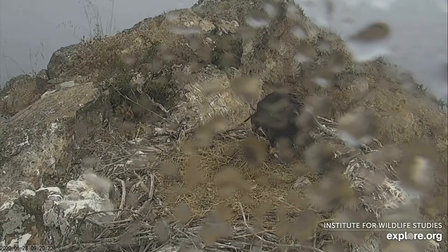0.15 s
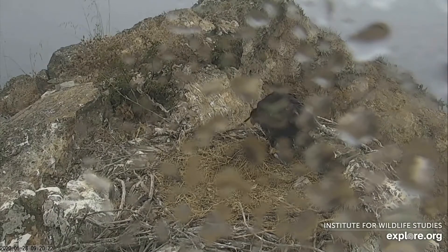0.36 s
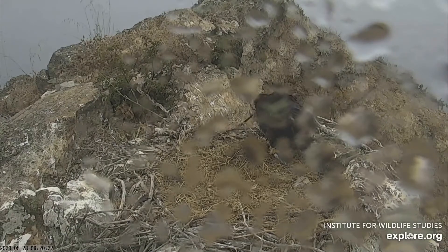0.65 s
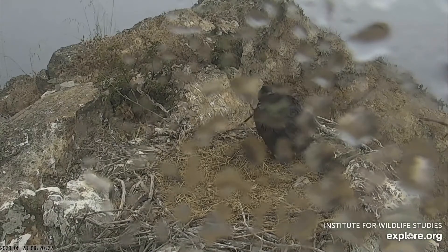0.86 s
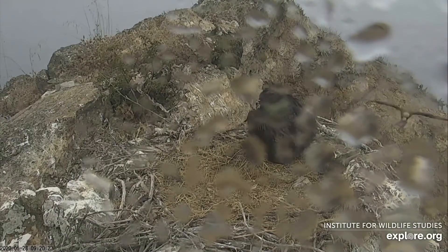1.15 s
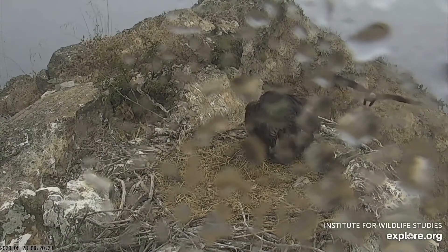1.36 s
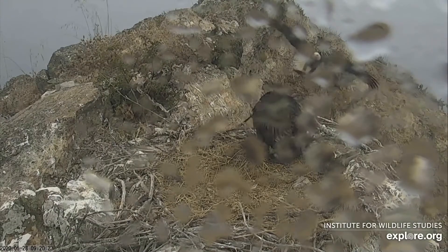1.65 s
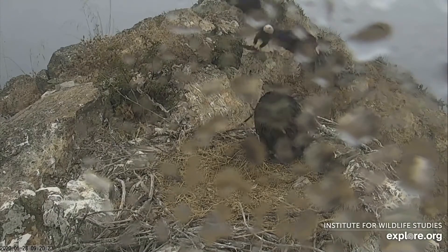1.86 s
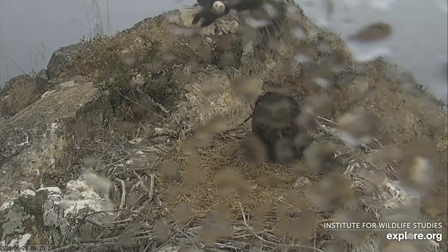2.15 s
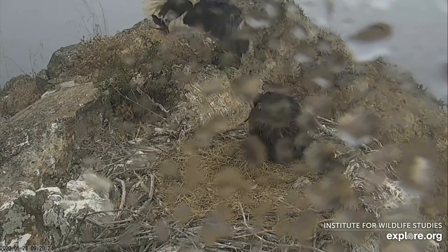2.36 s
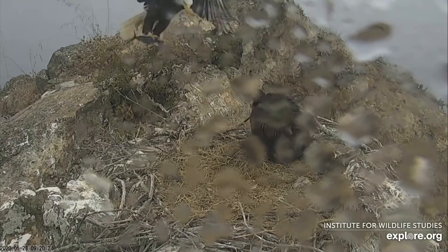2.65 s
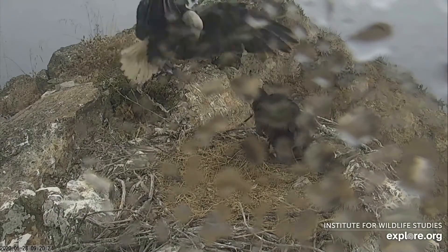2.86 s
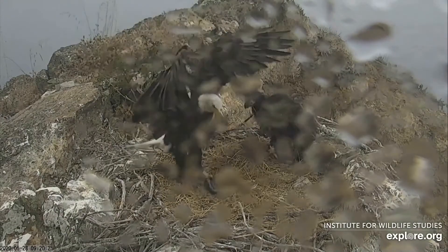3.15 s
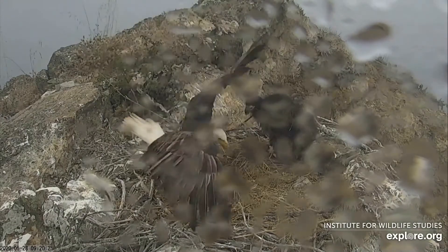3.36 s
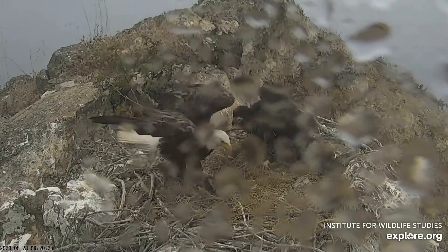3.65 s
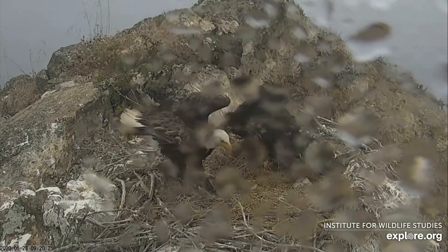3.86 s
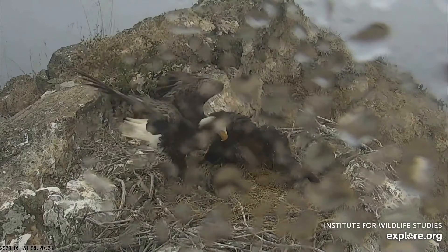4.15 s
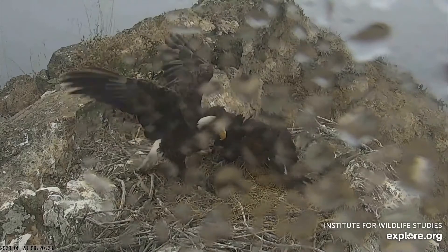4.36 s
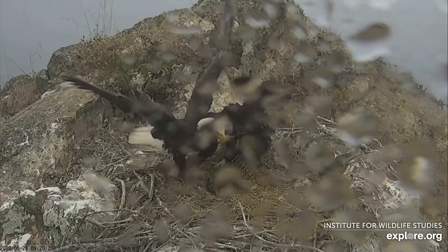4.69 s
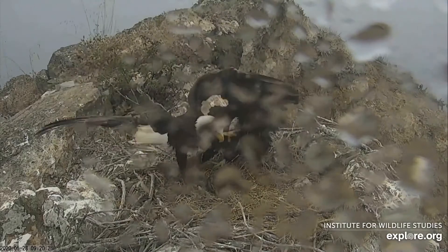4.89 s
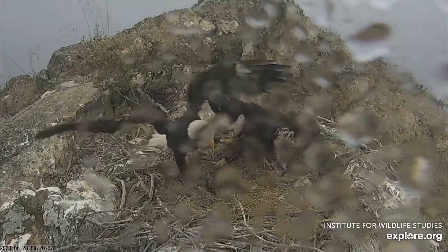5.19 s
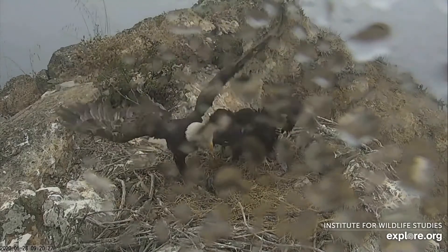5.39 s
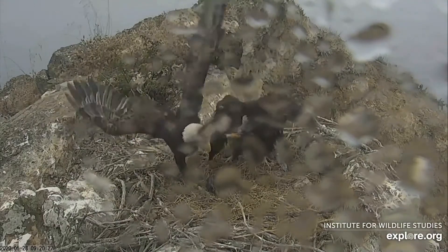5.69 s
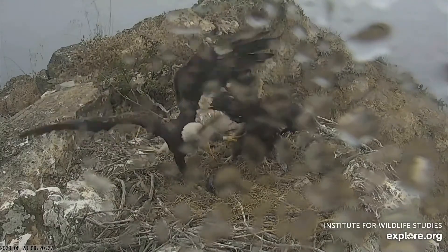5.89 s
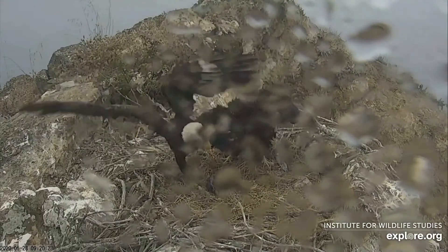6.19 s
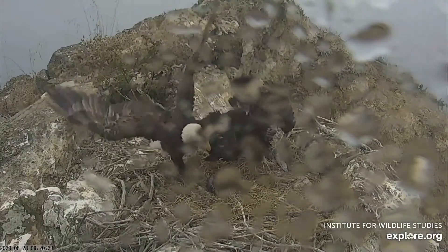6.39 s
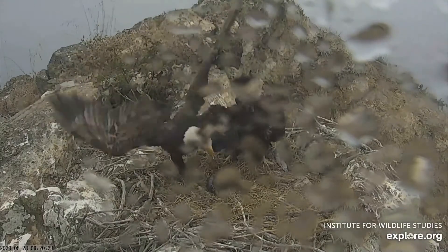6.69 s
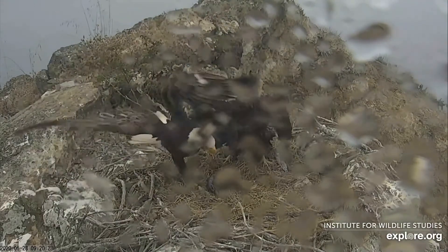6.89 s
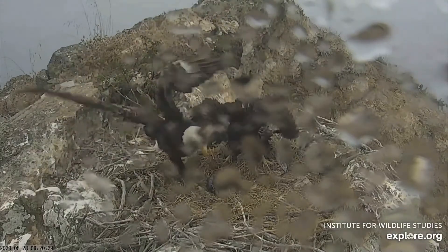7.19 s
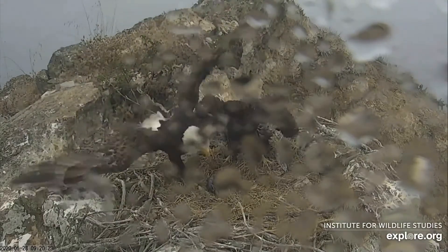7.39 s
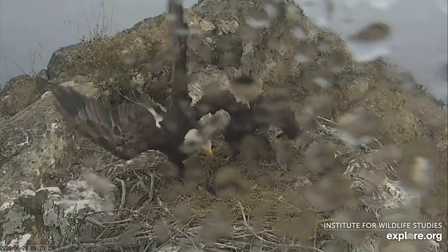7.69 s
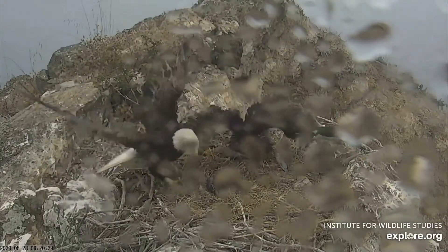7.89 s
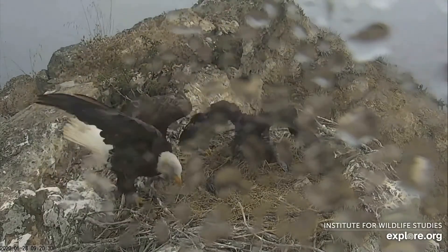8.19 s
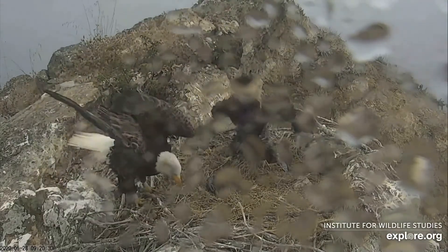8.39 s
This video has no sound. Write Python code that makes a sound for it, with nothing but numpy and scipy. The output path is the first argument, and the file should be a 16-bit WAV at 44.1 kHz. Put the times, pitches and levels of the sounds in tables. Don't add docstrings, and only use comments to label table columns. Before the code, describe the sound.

Steady rain rumbles, patters and hisses around an exposed hilltop nest. A young eagle starts faint, near-pure begging whistles. Wings whoosh in, sticks crack and feet land with a soft low thump. The young bird's calls then become much louder, lower and slightly hoarse, in three wavering stretches, before a late step, more cracks and one thin drooping whistle. One outdoor microphone in a nasal-sounding housing, with thin, slightly watery sound quality.

```python
import sys
import numpy as np
from scipy import signal
from scipy.fft import rfft, irfft, next_fast_len
from scipy.io import wavfile
from scipy.ndimage import uniform_filter1d, minimum_filter1d, map_coordinates

SR = 44100
rng = np.random.default_rng(int(sys.argv[2]) if len(sys.argv) > 2 else 0)


def pcm_store(signal):
    levels = np.round(np.clip(np.atleast_2d(signal), -1, 1) * 32767)
    wavfile.write(sys.argv[1], SR, levels.astype(np.int16).T)


def boost_factor(decibels):
    exponent = np.asarray(decibels, float) / 20
    return 10 ** exponent


N = 376613
STEP = 44


def unit(x):
    return x / np.sqrt(np.mean(x ** 2) + 1e-20)


def curves(rows):
    s, *cols = np.transpose(rows)
    return [np.interp(np.arange(N) / SR, s, c) for c in cols]


def wobble(rate):
    knots = rng.standard_normal(int(N * rate / SR) + 4)
    return map_coordinates(knots, [np.arange(N) * rate / SR])


def bump(at, width):
    return np.exp(-((np.arange(N) / SR - at) / width) ** 2)


def noise():
    return rng.standard_normal(N)


def filtered(x, response):
    m = next_fast_len(len(x) + 8192)
    return irfft(rfft(x, m) * response(np.fft.rfftfreq(m, 1 / SR)), m)[:len(x)]


def colour(points):
    f, db = np.transpose(points)
    return lambda hz: boost_factor(np.interp(np.log(hz + 1), np.log(f + 1), db))


def patches(shape, bands, frames):
    luck = uniform_filter1d(rng.standard_normal(shape), size=bands, axis=0)
    return unit(uniform_filter1d(luck, size=frames, axis=1))


# t/s, rumble level/dB, patter level/dB, hiss level/dB
RAIN_LEVELS = [
    (0.0, -50.5, -52.5, -52.5),
    (2.43, -50, -50, -52.5),
    (8.54, -51, -53.5, -51),
]
# f/Hz, level/dB
RUMBLE_COLOUR = [(12, -73), (30, -52), (48, -31), (72, -6), (117, -7.5), (177, 0.5), (412, -9.5),
                 (461, -12), (900, -13.5), (1170, -14.5), (1980, -120)]
# f/Hz, level/dB
PATTER_COLOUR = [(290, -32), (500, -19), (833, -15.5), (883, -14.5), (1090, -13), (1150, -12), (1400, -9.5),
                 (1830, -9), (2130, -6), (2510, 1.5), (2690, -1.5), (3020, -9), (3760, -19), (4690, -19.5),
                 (5090, -20), (5650, -19), (8000, -26), (10400, -31.5), (17600, -120)]
# f/Hz, level/dB
HISS_COLOUR = [(2940, -10), (5000, -2.5), (11900, -6.5), (14800, -6), (15400, -5)]


def rain():
    rumble_db, patter_db, hiss_db = curves(RAIN_LEVELS)
    rumble = unit(filtered(noise(), colour(RUMBLE_COLOUR)))
    rumble *= boost_factor(rumble_db + 0.78 + 0.26 * wobble(3.32))
    hits = rng.random(N) < 900 / SR
    drops = hits * noise() * boost_factor(1.2 * rng.exponential(size=N))
    patter = unit(filtered(noise() + 0.37 * unit(drops), colour(PATTER_COLOUR)))
    patter *= boost_factor(patter_db + 9.0 + 1.15 * wobble(6.5) + 0.98 * wobble(30))
    hiss = unit(filtered(noise(), colour(HISS_COLOUR)))
    hiss *= boost_factor(hiss_db + 3.5 + 0.47 * wobble(5.2))
    return rumble + patter + hiss


SPLIT_TIMES = [2.74, 2.87, 3.6, 3.68, 5.0, 5.38, 5.58, 5.8, 7.53, 7.97, 8.49]


def apart():
    split_s, split_db, patch_db = 0.014, -14, -11.5
    _, t, z = signal.stft(rain(), SR, nperseg=1024)
    luck = patches(z.shape, 12, 4)
    luck = luck[(80 * np.log(np.arange(len(z)) + 4.)).astype(int)]
    flicker = sum(np.exp(-((t - s) / split_s) ** 4) for s in SPLIT_TIMES)
    gate = boost_factor(patch_db) * (luck > 2.1) + boost_factor(split_db) * flicker
    difference = signal.istft(z * gate, SR, nperseg=1024)[1][:N]
    tone = [(60, -6), (150, -17), (350, -5), (4000, -6.0), (12000, 5.5)]  # f/Hz, level/dB
    return filtered(difference, colour(tone))


# t/s, peak level/dB, half length/s
WING_BEATS = [
    (2.34, -44.5, 0.11),
    (2.751, -40.5, 0.22),
    (3.02, -36, 0.021),
    (4.124, -50, 0.047),
    (4.195, -43, 0.09),
    (4.394, -39, 0.089),
    (6.13, -41, 0.05),
    (7.071, -44, 0.03),
    (7.87, -42.5, 0.073),
]


def wings():
    swell = sum(boost_factor(db) * bump(s, half) for s, db, half in WING_BEATS)
    feathers = unit(filtered(noise(), lambda hz: colour(PATTER_COLOUR)(hz) * hz / (hz + 2500)))
    return swell * boost_factor(1.1 * wobble(60)) * feathers


# t/s, peak level/dB, f/Hz
FOOTFALLS = [
    (3.19, -24.5, 110),
    (7.979, -23.5, 91),
]


def feet():
    out, t = np.zeros(N + SR), np.arange(SR // 4) / SR
    for s, db, hz in FOOTFALLS:
        push = (1 - np.exp(-t / 0.0019)) * np.sin(2 * np.pi * hz * t)
        out[round(s * SR):][:len(t)] += boost_factor(db - 60 * t / 0.044) * push
    return filtered(out[:N], lambda hz: (1j * hz / (55 + 1j * hz)) ** 2)


# f/Hz, width/Hz, level/dB
HOUSING_PEAKS = [(1710, 280, -7), (2500, 380, 11.5)]


def housing(f):
    total = 0
    for k, (centre, width, db) in enumerate(HOUSING_PEAKS):
        ring = 1j * f * width / (centre * centre - f * f + 1j * f * width)
        total = total + (-1) ** k * boost_factor(db) * ring
    return total


# t/s, peak level/dB, bright level/dB, dull level/dB, fade by 60 dB/s
STICK_SNAPS = [(2.7274, -20, -30, -41, 0.0085), (2.738, -17, -32, -46, 0.018),
               (2.998, -21, -48, -43, 0.021), (3.01, -19, -40, -45, 0.017), (3.1764, -26.5, -47, -41, 0.02),
               (6.8, -27.5, -38, -43, 0.021), (7.44, -15, -31, -44, 0.01), (7.451, -31, -36, -48, 0.014),
               (7.846, -33, -42.5, -34, 0.034), (7.8578, -30, -38, -44, 0.016),
               (7.8934, -37, -40, -42, 0.019), (7.97, -21, -55, -25, 0.018),
               (7.9734, -23, -52, -17.5, 0.0096), (8.001, -30, -55, -50, .015),
               (8.048, -37, -51, -34, 0.016), (8.06, -40, -40, -43, 0.016), (8.152, -30, -55, -50, .012),
               (4.393, -28, -48, -45, .012), (5.038, -28, -51, -50, 0.0083)]


def sticks():
    out, t = np.zeros(N + SR), np.arange(2048) / SR
    bright_tone = [(600, -42), (3000, -2), (4500, 3.0), (7500, -3.0), (9500, -30), (15000, -14)]  # f/Hz, level/dB
    for s, db, bright_db, dull_db, t60 in STICK_SNAPS:
        crack = rng.standard_normal((2, len(t))) * boost_factor(-60 * t / t60) * (1 - np.exp(-t / 0.00068))
        bright = filtered(crack[0], colour(bright_tone))
        boxy = filtered(crack[1], lambda f: housing(f) / (1 + (f / 4000) ** 2))
        dull = np.sin(2 * np.pi * 1720 * t) * boost_factor(-60 * t / 0.0036) * (1 - np.exp(-t / 0.00034))
        snap = boost_factor(bright_db + 13.0) * bright + boost_factor(db + 7.0) * boxy + boost_factor(dull_db + 10.5) * dull
        out[round(s * SR):][:len(t)] += snap
    return out[:N]


# t/s, length/s, first f/Hz, last f/Hz, level/dB
UPPER_GLIDES = [(1.092, 0.1, 2510, 2360, -43.5), (1.27, 0.053, 3150, 3070, -52),
                (1.331, 0.088, 3070, 3300, -54), (1.426, .07, 3280, 3290, -54),
                (1.5, .042, 3350, 3300, -50), (1.54, .035, 3320, 3420, -51), (1.575, .075, 3450, 3530, -58),
                (1.581, 0.13, 2780, 2850, -54), (2.405, .027, 3650, 3750, -57),
                (2.432, .036, 3880, 3920, -53), (2.475, .06, 3980, 4280, -56),
                (2.574, 0.045, 3880, 4050, -43), (2.853, 0.078, 4090, 4160, -39.5),
                (2.855, .02, 4100, 4450, -45), (2.92, .015, 4220, 4340, -46),
                (2.935, .027, 4320, 4230, -41), (3.101, .037, 4370, 4330, -41.5),
                (3.467, 0.071, 4240, 4240, -48), (3.52, .04, 4600, 4540, -53),
                (3.565, 0.11, 4100, 4200, -53), (3.631, 0.06, 4290, 4340, -43.5),
                (4.07, 0.025, 4230, 4400, -43), (4.093, 0.035, 4330, 4050, -43.5),
                (4.107, 0.054, 3750, 3640, -41.5), (4.11, .04, 2950, 2900, -47.5),
                (4.135, 0.022, 4200, 3900, -41), (8.152, 0.056, 2630, 2900, -57)]


def other_side():
    out, size, drift = np.zeros(N), boost_factor(2.4 * wobble(70)), 1 + .012 * wobble(150)
    for s, length, first_hz, last_hz, db in UPPER_GLIDES:
        u = np.linspace(0, 1, int(length * SR))
        at = slice(int(s * SR), int(s * SR) + len(u))
        hz = (first_hz + (last_hz - first_hz) * u) * drift[at]
        swell = np.abs(np.sin(np.pi * u)) ** 0.26
        out[at] += boost_factor(db) * swell * size[at] * np.sin(2 * np.pi * np.cumsum(hz) / SR)
    return out


def fine(coarse):
    return np.interp(np.arange(N), np.arange(len(coarse)) * STEP, coarse)


def bells(s, half, starts):
    t = np.arange(N // STEP + 2)[:, None] * STEP / SR
    call = np.searchsorted(starts, s + .002)
    opening = 1 - np.exp(-np.clip(t - np.take(starts, call - 1), 0, 1) / 0.00095)
    return (np.searchsorted(starts, t) == call) * opening * np.exp(-((t - s) / half) ** 2)


# t/s, change/%
WAVERS = [(2.387, 4.5), (2.712, -3.5), (2.737, -4.5), (2.771, 1), (3.075, -2), (2.44, 1.5), (2.56, 2),
          (4.5, 2.5), (3.734, -2), (3.765, 0.5), (3.948, 4), (4.033, 10), (4.258, 0.5), (4.893, 2),
          (6.238, -2.5), (6.359, -3), (6.438, -2), (7.738, 3.5), (4.24, -2), (4.36, -0.8), (5.55, 2.6),
          (5.85, 1), (6.29, 1.5), (6.42, 0.5), (7.19, 0.3), (7.669, 1.5)]
# t/s, change/%
PITCH_FLICKS = [(2.463, -6), (2.665, 3.5), (2.985, -3.5), (3.036, 4), (3.701, 8), (3.776, 6.5),
                (3.792, -1.5), (3.958, 5.5), (3.981, 8), (5.344, 3), (5.42, 3.5), (8.208, -3), (8.284, -5),
                (2.996, 2)]
# t/s, half length/s
VOICE_CATCHES = [(2.405, .006), (2.533, .004), (2.674, 0.0036), (2.695, .004), (2.727, 0.0037),
                 (2.786, 0.0033), (2.817, .004), (2.838, 0.0041), (2.914, .014), (2.95, .005),
                 (3.065, 0.0034), (3.088, 0.0031), (3.125, .01), (2.456, .005), (2.638, 0.0025),
                 (3.03, .003), (4.004, .003), (4.018, 0.003), (4.083, 0.009), (4.304, 0.0025),
                 (4.787, 0.0038), (4.873, 0.0029), (5.519, .006), (5.808, .004), (6.036, 0.0036),
                 (6.118, .007), (7.669, 0.0037)]
# t/s, length/s, first change/%, last change/%
FLIPS = [
    (2.011, 0.17, 8.6, 12.3),
    (4.154, 0.115, 5.1, 6.1),
    (4.6, 0.1, 4, 3),
    (5.366, 0.03, 11.5, 11),
    (5.684, .06, 6.5, 3.93),
    (7.529, 0.11, 17.3, 13.2),
    (8.524, 0.028, 8, 10),
]
# t/s, change/%
FINAL_FALLS = [
    (2.1, -20),
    (3.126, -30),
    (4.983, -42),
    (6.67, -17.5),
]
# t/s, half length/s, level/dB
BREATH_FLYING = [(1.775, 0.036, -48), (1.916, 0.11, -39.5), (1.996, 0.009, -42), (2.091, 0.026, -37.5),
                 (2.122, 0.0072, -44), (2.365, 0.0066, -34.5), (2.427, 0.07, -44), (2.5, 0.03, -35),
                 (2.549, 0.019, -41), (2.62, 0.064, -38.5), (2.654, 0.016, -36), (2.684, 0.0072, -31),
                 (2.711, 0.012, -30), (2.74, 0.0075, -31), (2.772, 0.017, -30), (2.805, 0.03, -41),
                 (2.849, 0.008, -35.5), (2.864, 0.044, -36.5), (2.991, 0.057, -35.5), (3.051, 0.0057, -46),
                 (3.09, 0.038, -39), (3.145, 0.012, -40.5)]
BREATH_LANDING = [(3.386, 0.014, -39.5), (3.433, 0.047, -43), (3.53, 0.068, -56), (3.738, 0.072, -32.5),
                  (3.791, 0.011, -37.5), (3.875, 0.036, -36.5), (3.939, 0.035, -36.5), (3.985, 0.01, -36.5),
                  (4.017, 0.017, -41.5), (4.058, 0.021, -40.5), (4.11, 0.014, -48), (4.141, 0.046, -34.5),
                  (8.2, 0.04, -48.5), (8.316, 0.058, -49), (8.387, 0.03, -35), (8.457, 0.02, -46),
                  (8.511, 0.015, -36.5), (8.532, 0.011, -48)]
BREATH_OUTER = [(4.184, 0.039, -17), (4.234, 0.006, -27.5), (4.248, 0.022, -29.5), (4.281, 0.021, -17.5),
                (4.326, 0.023, -19), (4.378, 0.039, -27), (4.43, 0.089, -62.0), (4.449, 0.0097, -34.5),
                (4.466, 0.022, -39), (4.511, 0.072, -39.5), (4.576, 0.007, -48.5), (4.632, 0.012, -39),
                (4.671, 0.0073, -42), (4.708, 0.016, -35.5), (4.763, 0.024, -33), (4.804, 0.013, -26.5),
                (4.833, 0.013, -41.5), (4.858, 0.0079, -39), (4.916, 0.046, -27.5), (4.992, 0.016, -34),
                (4.997, 0.0063, -29.5), (7.076, 0.021, -23), (7.105, 0.053, -24), (7.153, 0.018, -31.5),
                (7.189, 0.023, -29), (7.22, 0.027, -27), (7.235, 0.006, -45.5), (7.284, 0.024, -28.5),
                (7.354, 0.0063, -39), (7.391, 0.025, -31.5), (7.428, 0.011, -40), (7.448, 0.09, -24),
                (7.505, 0.0077, -39.0), (7.542, 0.006, -42.0), (7.582, 0.023, -31.5), (7.606, 0.0087, -35),
                (7.638, 0.013, -28), (7.701, 0.052, -27), (7.723, 0.0073, -19.5), (7.777, 0.093, -32.5),
                (7.782, 0.09, -45.5), (7.788, 0.0053, -34)]
BREATH_MIDDLE = [(5.285, 0.011, -28.5), (5.33, 0.038, -35), (5.359, 0.012, -31), (5.402, 0.038, -25.5),
                 (5.431, 0.007, -28), (5.447, 0.015, -23.5), (5.486, 0.032, -26), (5.534, 0.0087, -41),
                 (5.566, 0.021, -37.0), (5.599, 0.0081, -33), (5.62, 0.045, -33), (5.686, 0.012, -43),
                 (5.72, 0.029, -32.5), (5.751, 0.011, -29), (5.783, 0.038, -28), (5.831, 0.0073, -37),
                 (5.846, 0.011, -39), (5.896, 0.029, -30), (5.915, 0.011, -35.5), (5.983, 0.032, -21.5),
                 (6.019, 0.01, -32), (6.069, 0.043, -36), (6.078, 0.01, -33.5), (6.158, 0.016, -25.5),
                 (6.169, 0.099, -61.5), (6.19, 0.035, -21.5), (6.256, 0.019, -33), (6.292, 0.015, -29),
                 (6.329, 0.009, -37), (6.361, 0.024, -29), (6.375, 0.085, -37.5), (6.426, 0.015, -33.0),
                 (6.498, 0.057, -22), (6.557, 0.029, -25.5), (6.585, 0.016, -36), (6.601, 0.0068, -30),
                 (6.657, 0.047, -30.5), (6.669, 0.015, -25)]
# t/s, half length/s, octave level/dB
BEAK_EARLY = [(2.365, 0.0087, -57), (2.525, 0.068, -51), (3.145, 0.01, -52), (3.385, 0.013, -51),
              (3.415, 0.023, -43.5), (3.72, 0.046, -50), (3.79, 0.011, -48), (4.187, 0.049, -32.5),
              (4.243, 0.012, -39), (4.283, 0.045, -29.5), (4.35, 0.0079, -45), (4.41, 0.065, -36.5),
              (4.495, 0.012, -51), (4.535, 0.026, -55), (4.588, 0.013, -49.5), (4.662, 0.05, -39.5),
              (4.72, 0.014, -49), (4.795, 0.034, -46.5), (4.836, 0.1, -36.5), (4.9, 0.0078, -38.5),
              (4.937, 0.0093, -48.0), (4.987, 0.013, -41), (5.291, 0.0078, -41.5), (5.316, 0.035, -45),
              (5.385, 0.014, -39.5), (5.429, 0.027, -55), (5.481, 0.018, -47.5), (5.507, 0.0064, -44),
              (5.533, 0.016, -47.5), (5.576, 0.036, -47), (5.647, 0.045, -47), (5.65, 0.008, -48),
              (5.753, 0.026, -38.5)]
BEAK_LATE = [(5.789, 0.022, -35), (5.829, 0.013, -34), (5.947, 0.082, -34.5), (5.959, 0.013, -48),
             (5.996, 0.011, -45.5), (6.084, 0.051, -36), (6.126, 0.0079, -39.0), (6.174, 0.028, -44),
             (6.23, 0.028, -36.5), (6.255, 0.015, -39.5), (6.331, 0.04, -36.5), (6.421, 0.092, -36.0),
             (6.439, 0.011, -36), (6.51, 0.009, -42), (6.573, 0.038, -38), (6.621, 0.013, -43.5),
             (6.665, 0.025, -35.5), (7.085, 0.029, -38), (7.142, 0.023, -42.5), (7.18, 0.01, -39),
             (7.212, 0.02, -39.5), (7.243, 0.016, -45), (7.3, 0.048, -33), (7.381, 0.023, -35.5),
             (7.419, 0.021, -35), (7.467, 0.029, -35), (7.496, 0.017, -42), (7.556, 0.051, -40),
             (7.612, 0.031, -37), (7.652, 0.0068, -26.5), (7.697, 0.02, -23.5), (7.76, 0.021, -45),
             (7.788, .006, -50)]


def melody(calls):
    waver_s, flick_s, fall_s, catch_depth = .015, .008, .028, .95
    shut_beak_db = -41
    t, starts = np.arange(N) / SR, [rows[0][0] for rows in calls]
    percent = sum(rise * bump(at, waver_s) for at, rise in WAVERS)
    percent += sum(rise * bump(at, flick_s) for at, rise in PITCH_FLICKS)
    for at, length, first, last in FLIPS:
        percent += (first + (last - first) * (t - at) / length) * (t > at) * (t < at + length)
    for at, drop in FINAL_FALLS:
        percent += drop * np.clip((t - at) / fall_s, 0, 1) ** 1.8 * (t < at + 2 * fall_s)
    hz = uniform_filter1d(curves(np.concatenate(calls))[0] * (1 + percent / 100), size=200)
    free = np.clip(1 - catch_depth * sum(bump(at, half) for at, half in VOICE_CATCHES), 0, 1)
    s, half, db = np.concatenate([BREATH_FLYING, BREATH_LANDING, BREATH_OUTER, BREATH_MIDDLE]).T
    first = free * fine(bells(s, half, starts) @ boost_factor(db))
    s, half, db = np.concatenate([BEAK_EARLY, BEAK_LATE]).T
    second = boost_factor(shut_beak_db) * first + fine(bells(s, half, starts) @ boost_factor(db))
    return hz, first, second


def sounding(notes, fade_s):
    on = np.zeros(N)
    for rows in notes:
        on[int(rows[0][0] * SR):int(rows[-1][0] * SR) + 2] = 1
    return uniform_filter1d(on, size=max(int(fade_s * SR), 1))


# t/s, f/Hz
THIN_CALLS = [
    [(1.73, 2970), (1.762, 3180), (1.864, 3307), (2.006, 3370), (2.131, 3414)],
    [(2.351, 3020), (2.49, 3244), (2.585, 3385), (2.606, 3830), (2.67, 3850), (2.79, 3895), (2.98, 3920),
     (3.03, 4050), (3.155, 4050)],
    [(3.37, 2800), (3.403, 3380), (3.445, 3520), (3.465, 4000), (3.59, 3820)],
    [(3.666, 4200), (3.684, 3560), (3.79, 3620), (3.831, 4140), (3.91, 4420), (4.0, 4440), (4.06, 4030),
     (4.105, 3380), (4.153, 3240)],
    [(8.195, 3270), (8.233, 3610), (8.331, 3550), (8.361, 3284), (8.415, 3114), (8.431, 2770),
     (8.465, 2750), (8.5, 3000), (8.539, 2980)],
]
# t/s, f/Hz
LOW_CALLS = [
    [(4.154, 2830), (4.265, 2635), (4.328, 2580), (4.4, 2735), (4.575, 2720), (4.6, 2755), (4.725, 2745),
     (4.79, 2640), (5.016, 2680)],
    [(5.272, 2270), (5.326, 2170), (5.35, 2410), (5.44, 2500), (5.603, 2480), (5.643, 2640), (5.662, 2850),
     (5.749, 2860), (5.757, 2680)],
    [(5.758, 2610), (5.8, 2610), (5.825, 2520), (5.99, 2442), (6.16, 2495), (6.3, 2450), (6.46, 2395),
     (6.55, 2479), (6.701, 2340)],
    [(7.046, 2213), (7.088, 2250), (7.2, 2280), (7.283, 2457), (7.401, 2370), (7.525, 2510), (7.645, 2500),
     (7.7, 2387), (7.782, 2560)],
    [(7.783, 2980), (7.794, 3050), (7.8, 3430), (7.844, 3600)],
]
# t/s, flutter depth/0-1
HOARSENESS = [(0, 0), (2.3, 0.15), (3.11, 0.2), (3.15, 0.54), (3.55, 0.33), (3.7, 0.1), (3.93, 0.3),
              (4.06, 0.3), (4.09, 0.7), (4.15, 0.68), (4.156, 0.15), (4.34, 0.12), (4.39, 0.24),
              (4.5, 0.16), (5.37, 0.08), (5.41, 0.17), (5.46, 0.08), (6.675, 0.04), (6.69, 0.45),
              (6.71, 0.06), (7.62, 0.11), (7.655, 0.26), (7.68, 0.1), (7.78, 0.16), (8.54, 0.07)]
# t/s, level/dB
THIRD_PARTIAL = [(0, -34), (4.3, -36), (5.9, -26), (6.2, -32), (6.4, -32), (6.44, -20), (6.5, -26),
                 (6.63, -27), (6.67, -14), (7.05, -12), (7.5, -22.5), (7.55, -30), (7.66, -25), (7.69, -18),
                 (7.75, -21)]
# delay/s, level/dB
ROCK_ECHOES = [
    (.0063, -24),
    (.011, -22),
    (.0167, -25),
    (.0231, -28),
]


def eaglet():
    calls = sorted(THIN_CALLS + LOW_CALLS)
    hz, first, second = uniform_filter1d(melody(calls), size=90)
    rough, third_db = np.clip(curves(HOARSENESS)[0], 0, 1), curves(THIRD_PARTIAL)[0]
    shake = .002 * wobble(90) + .036 * rough * wobble(400) + np.minimum(.02 * rough, .004) * wobble(55)
    phase = 2 * np.pi * np.cumsum(hz * (1 + shake)) / SR
    tone = first * boost_factor(0.2 * wobble(60)) * np.sin(phase)
    tone += second * boost_factor(1.2 * wobble(110)) * np.sin(2 * phase + 1)
    tone += second * boost_factor(third_db + 1.47 * wobble(50)) * np.sin(3 * phase)
    tone += second * boost_factor(-33 + 3 * wobble(25)) * np.sin(4 * phase)
    beat = np.sin(2 * np.pi * np.cumsum(420 * (1 + .2 * wobble(250))) / SR)
    tone *= (1 + 1.4 * rough ** 2 * beat) * boost_factor(np.minimum(12 * rough, 2.2) * wobble(130))
    voice = np.sqrt(2) * (tone * sounding(calls, 0.0091) + other_side())
    return voice + sum(boost_factor(db) * np.roll(voice, int(s * SR)) for s, db in ROCK_ECHOES)


def scene():
    lean_db = 0.36 * np.clip(0.97 + wobble(9), 0, 1.5)
    background = rain() + apart() * [[1], [-1]]
    bird = eaglet() * boost_factor([[-1], [1]] * lean_db)
    return background + wings() + feet() + sticks() + bird


def starved(x, below_db, reach_hz):
    hz, _, z = signal.stft(x, SR, nperseg=2048)
    power = np.abs(z.mean(0)) ** 2
    loudest_near = -minimum_filter1d(-power, size=int(2 * reach_hz / hz[1]), axis=0)
    mask = loudest_near * boost_factor(2 * below_db)
    mask = np.roll(mask, int(0.49 * reach_hz / hz[1]), axis=0)
    band = uniform_filter1d(uniform_filter1d(power, size=8, axis=0), size=3, axis=1)
    margin_db = 10 * np.log10(np.abs(band) / (mask + 1e-20) + 1e-20) + 5 * patches(power.shape, 8, 5)
    keep = 0.035 + 0.92 / (1 + np.exp(-np.clip(3.4 * margin_db, -30, 30)))
    return signal.istft(z * keep, SR, nperseg=2048)[1][:, :N]


def roll_off(x):
    return signal.sosfilt(signal.butter(12, 16640, fs=SR, output="sos"), x)


def record(dry):
    both = starved(dry, below_db=-37.5, reach_hz=700)
    both = np.array([filtered(side, lambda hz: hz < 15500) for side in both])
    return roll_off(both)


dry = scene()
out = record(dry)
pcm_store(out)
```